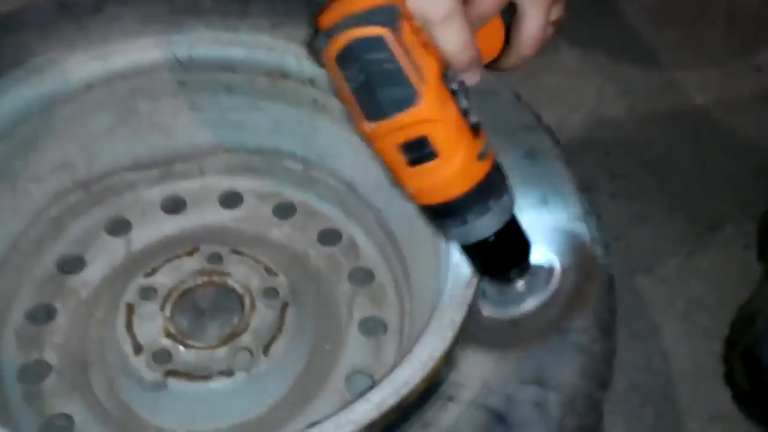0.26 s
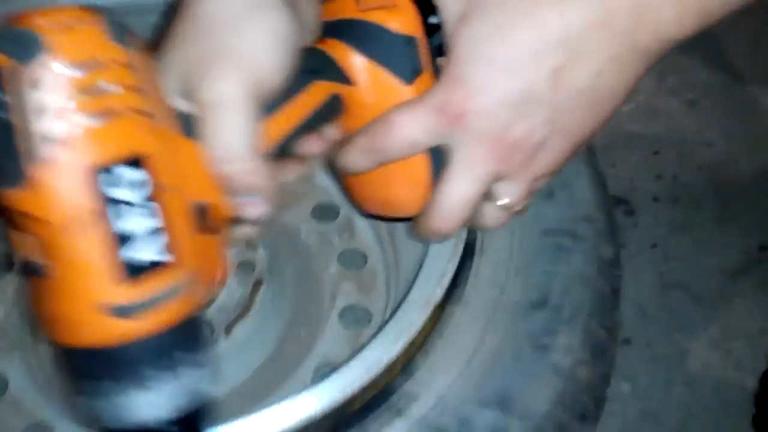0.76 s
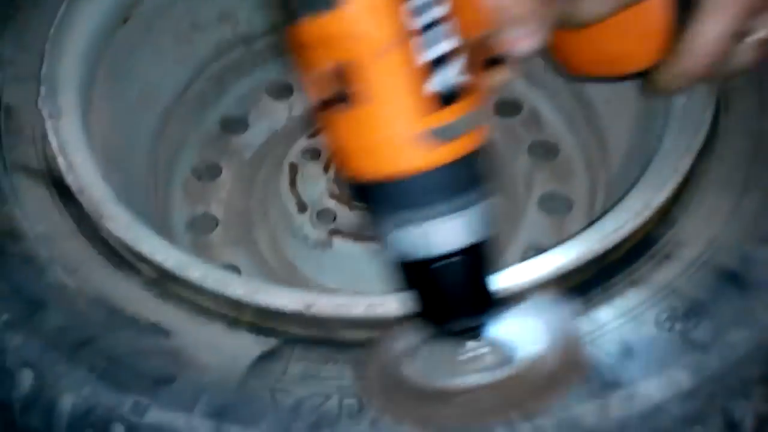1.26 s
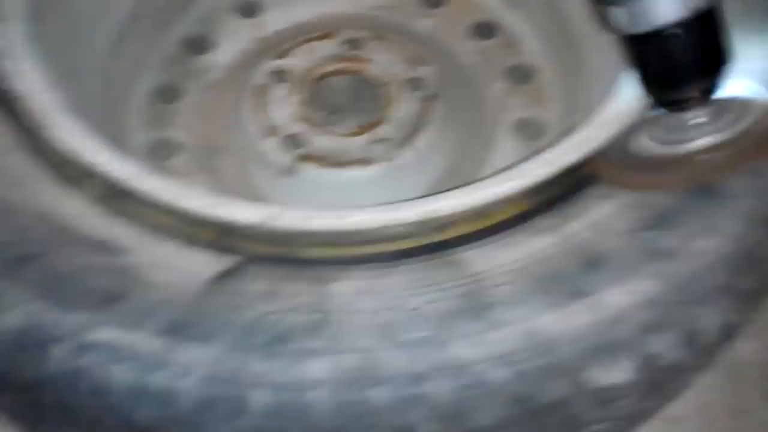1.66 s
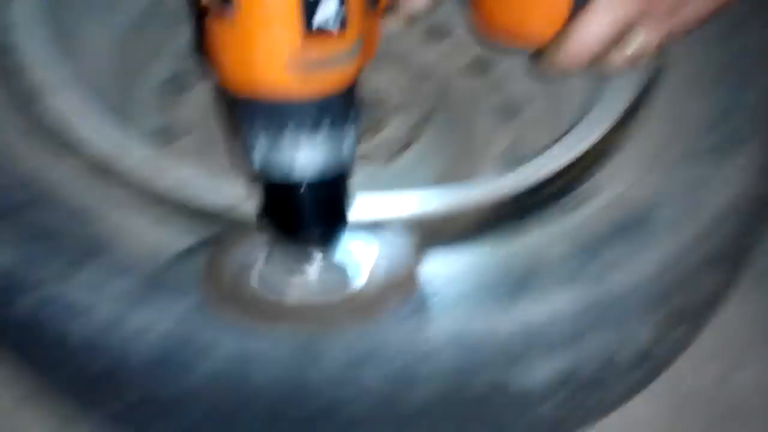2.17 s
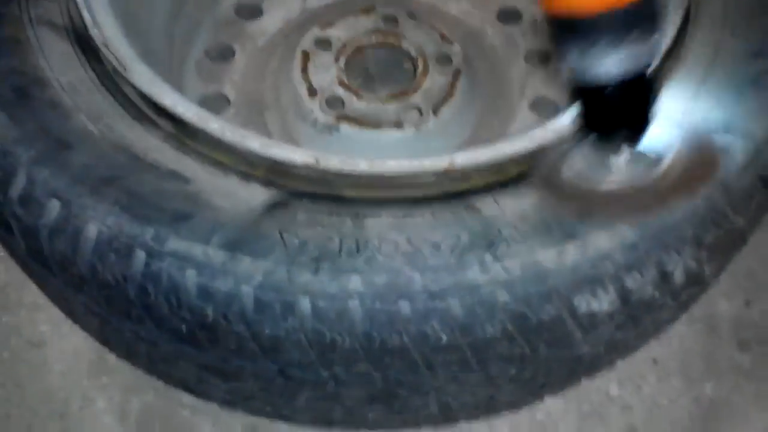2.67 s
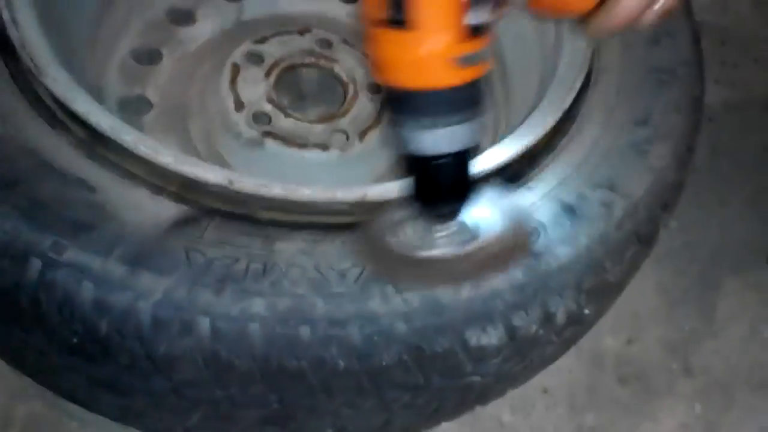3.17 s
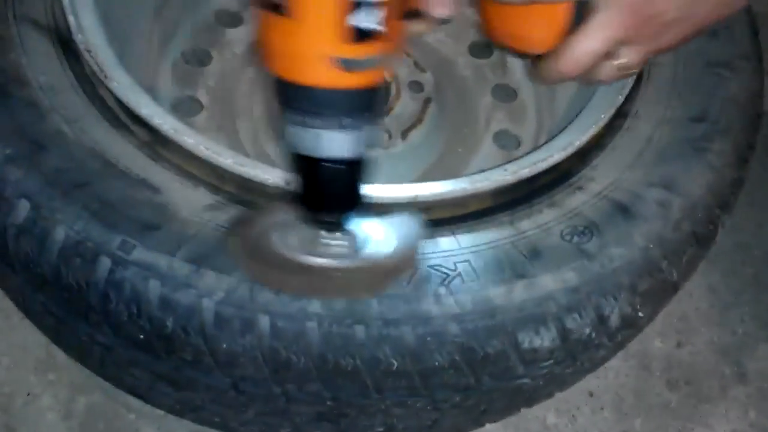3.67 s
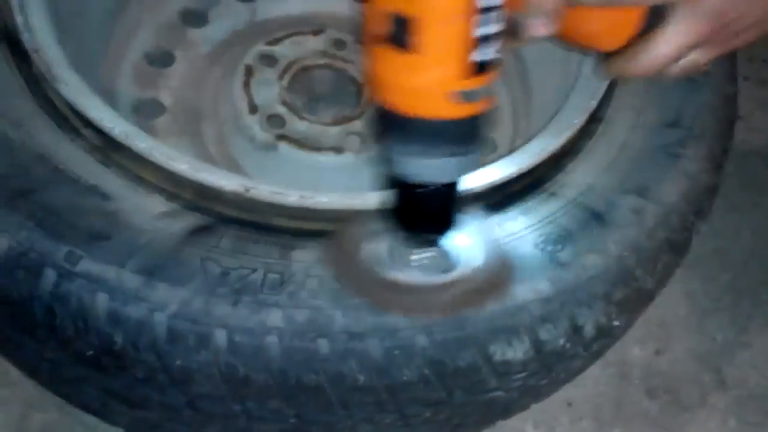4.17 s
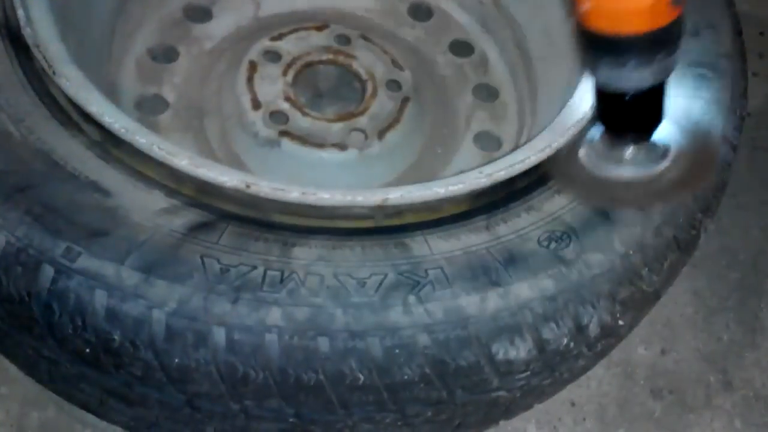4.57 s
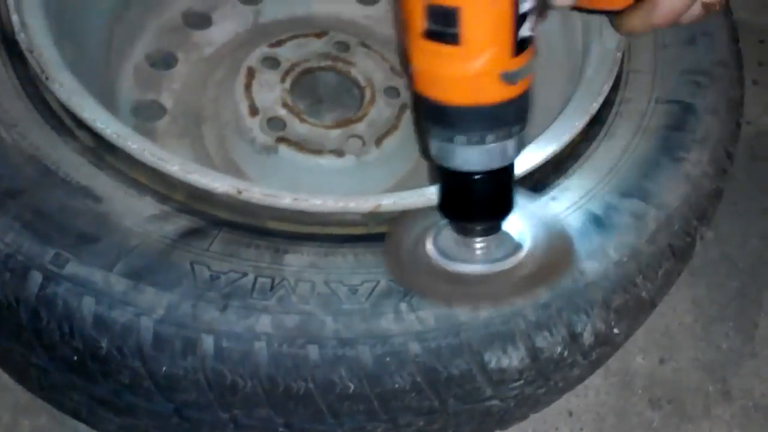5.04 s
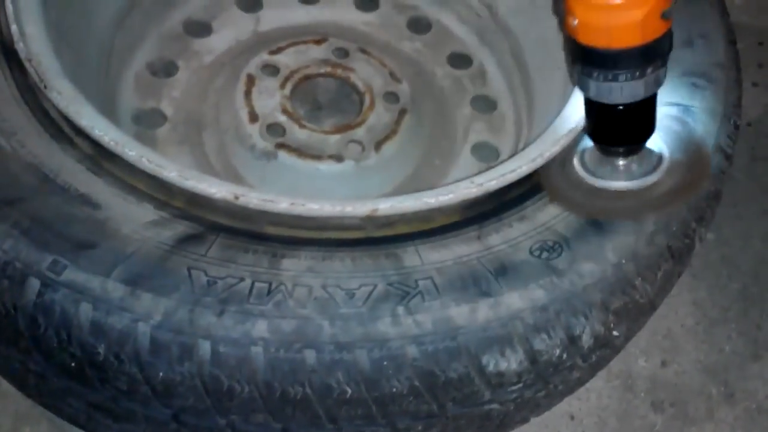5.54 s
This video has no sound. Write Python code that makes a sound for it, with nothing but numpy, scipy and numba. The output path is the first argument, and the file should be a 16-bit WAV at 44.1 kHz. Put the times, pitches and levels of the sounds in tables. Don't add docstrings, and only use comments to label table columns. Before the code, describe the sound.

Dense, gritty wire-brush scrubbing fills a garage, fluttering rapidly, with wavering drill whine, sharp wire clicks and a low hollow tyre hum.

```python
import sys
import numpy as np
from scipy import signal
from scipy.fft import rfft, irfft
from scipy.io import wavfile
from numba import njit

SR = 44100
rng = np.random.default_rng(int(sys.argv[2]) if len(sys.argv) > 2 else 0)


def voltage_ratio(level):
    return 10 ** (np.asarray(level, float) / 20)


def waveform_to_disk(signal):
    frames = np.transpose(np.atleast_2d(signal))
    scaled = np.clip(frames, -1, 1) * 32767
    samples = np.round(scaled).astype(np.int16)
    wavfile.write(sys.argv[1], SR, samples)


N = 256220

# t/s, turns ahead of the mean speed, swell level/dB
WHEEL_WOBBLE = [(0, .15, .6), (.4, .14, 1.4), (.95, .72, .8), (1.11, .2, .2), (1.3, .02, 1.8),
                (1.58, .17, 2.9), (1.78, -.03, 2), (1.95, -.58, .5), (2.4, -.16, .9), (2.76, -.09, 2.4),
                (3.1, -.23, 1.3), (3.24, .13, .9), (3.8, .32, .7), (3.95, .58, .8), (4.5, .67, 1.7),
                (4.82, .18, 1.2), (5.15, .54, 1.4), (5.81, .34, .7)]
# t/s, scouring level/dB, lean from steel rim 0 to rubber wall 1
HAND = [(0, -21, 0.55), (.12, -18, 0), (.32, -17.5, 0.08), (.61, -20, 0.57), (.8, -18, 0.46),
        (1.03, -17, 0.61), (1.11, -14.5, 0.24), (1.27, -17.5, 0.43), (1.5, -16.5, 0.02), (2.04, -17, 0.75),
        (2.46, -15.5, 0.25), (2.9, -19, 0.19), (3.17, -21.5, 1), (4.43, -18.5, 0.62), (4.7, -18.5, 0.46),
        (4.95, -20.5, 0.99), (5.3, -19, 0.45), (5.81, -18.5, 0.23)]
# f/Hz, level/dB (per Hz)
SCOUR_COLOUR = [(180, -32.5), (300, -14.5), (400, -20.5), (596, -15.5), (722, -11.5), (1250, -7),
                (1490, -10), (2380, -9), (2900, -4.5), (4120, -.5), (5500, -6.5), (6800, -9.5), (7400, -14),
                (8000, -29.5)]
# start t/s, end t/s, from f/Hz, to f/Hz, level/dB
RIM_GLINTS = [(-.5, .36, 4200, 4000, -1), (.32, .95, 3990, 4740, 0.5), (.75, 1.16, 4810, 4230, 1),
              (.88, 1.14, 3980, 3810, -1.5), (1.2, 1.5, 4370, 4590, -5.5), (1.7, 2.3, 4250, 4030, -2),
              (2.2, 3.1, 4440, 4120, -14.5), (3.15, 3.8, 4250, 4270, -0.5), (3.9, 4.35, 4480, 4440, 0.5),
              (4.2, 5.1, 4040, 4180, 0.5), (4.9, 5.5, 4000, 4270, 0), (5.4, 5.85, 4310, 4080, -1.5)]
# start t/s, end t/s, from f/Hz, to f/Hz, level/dB
WALL_GLINTS = [(.42, .75, 4060, 4550, -2.5), (.58, .9, 4410, 4880, 0), (-.3, 0.298, 5560, 5500, 2.5),
               (0.347, 0.794, 6440, 7460, 2.5), (0.398, 1.0, 1760, 1700, 6.5),
               (0.854, 1.505, 1590, 1910, 1.5), (1.245, 1.75, 5840, 5190, 1), (1.7, 2.799, 1663, 1750, -12),
               (1.744, 2.196, 6150, 6140, -6), (2.151, 2.948, 6120, 5410, 3),
               (2.899, 3.903, 1707, 1520, -6), (3.0, 3.45, 4600, 5080, 8.5), (3.3, 4.15, 4820, 4900, 5.5),
               (.8, 1.35, 630, 582, 0), (2.4, 3.1, 1275, 1354, -10), (2.6, 3.15, 4350, 4450, -7.5),
               (2.7, 3.15, 5750, 5460, -2), (2.75, 3.1, 3460, 3370, -6.5), (4.004, 4.361, 5350, 5440, 5),
               (4.2, 5.204, 1850, 1816, -20.5), (4.7, 5.4, 5050, 5140, 2), (5.2, 6.102, 5180, 5050, -4.5)]
# start t/s, end t/s, from f/Hz, to f/Hz, share removed 0-1
FLOOR_SHADOWS = [(-.3, 0.548, 2300, 2170, 0.2), (.3, 0.699, 3450, 3630, .4), (0.557, .92, 3800, 4020, 0.3),
                 (1.244, 1.95, 2350, 2170, 0.6), (1.944, 2.444, 2250, 2150, 0.93),
                 (2.445, 3.141, 2300, 2330, 0.3), (4.104, 4.548, 2400, 2430, .4),
                 (4.607, 4.95, 2300, 2290, .3), (5.155, 5.9, 2250, 2320, 0.18)]
# start t/s, end t/s, from f/Hz, to f/Hz, share added
DISH_STREAKS = [(1.7, 2.75, 1700, 1750, 0.65), (1.746, 2.551, 1040, 1083, 0.67),
                (2.446, 3.154, 1190, 1340, 0.38), (3.101, 3.8, 1620, 1616, 0.13),
                (3.145, 4.151, 1374, 1327, 0.25), (3.948, 4.555, 1787, 1800, 0.61),
                (4.052, 4.75, 1233, 1200, 0.13), (4.753, 5.249, 1375, 1373, .6),
                (4.95, 5.8, 1202, 1247, 0.28), (3.957, 4.283, 480, 440, 1), (3.949, 4.25, 300, 297, 0.88),
                (2.302, 3.153, 1453, 1500, -0.31), (2.549, 3.045, 1002, 1030, -0.84),
                (3.603, 4.0, 1012, 1024, -.5), (4.0, 4.651, 1640, 1660, -.5), (4.2, 4.901, 1010, 997, -0.6),
                (5.047, 5.699, 1605, 1570, -.5), (5.149, 5.902, 1030, 1040, -.5)]
# f/Hz, width f/Hz, level/dB
WORK_MODES = [(509, 30, -51), (641.5, 53, -50.5), (914, 57, -47.5), (1325, 170, -39.5), (2647, 140, -41.5)]
# start t/s, deepest t/s, end t/s, sag f/Hz, whine level/dB
BITES = [(-.1, .17, .5, 270, -36), (.7, .83, .98, 200, -29), (.8, .99, 1.12, 400, -17.5),
         (1.0, 1.1, 1.3, 300, -26), (1.2, 1.45, 1.6, 85, -29), (1.38, 1.6, 1.95, 125, -28),
         (1.95, 2.35, 2.68, 30, -34), (2.5, 2.69, 2.9, 210, -28), (2.72, 2.9, 3.1, 225, -31),
         (3.15, 3.48, 3.75, 95, -34), (4.04, 4.14, 4.26, 230, -27.5), (4.12, 4.29, 4.36, 230, -30),
         (4.26, 4.41, 4.56, 150, -29.5), (4.42, 4.57, 4.72, 380, -28), (4.58, 4.71, 4.83, 370, -30.5),
         (4.72, 4.8, 4.85, 200, -28), (5.14, 5.19, 5.4, 100, -28), (5.24, 5.38, 5.5, 265, -27),
         (5.42, 5.5, 5.6, 100, -31), (5.5, 5.66, 5.84, 400, -26.5), (5.68, 5.76, 5.95, 60, -38)]
# t/s, gain level/dB, pitch lift f/Hz
GRABS = [(.785, 0, -29.5), (.83, 6.5, 0), (.865, 0, 40), (.895, 0.5, 10), (.925, -2, 18.5), (.955, -5, -29),
         (.987, 3, 19.5), (1.015, -10.5, -39.5), (1.052, 3.5, 10), (1.085, -1.5, -59.5), (1.118, 9, -12),
         (1.315, 3, -50.5), (1.425, 1.5, 33), (1.48, -1.5, 19), (1.538, -0.5, -11), (1.598, 1.5, -1),
         (1.657, 3, 0), (1.71, 4, 19.5), (1.772, 3, -29), (2.637, 0.5, -9), (2.665, -5, 1),
         (2.697, -1, -20), (2.722, -5, 1.5), (2.751, 0.5, -21.5), (2.78, -5, -0.5), (2.81, -1.5, -29.5),
         (2.842, -6.5, 0), (2.872, 0, -20), (2.9, -4, 0.5), (2.93, 2, -11.5), (2.957, -5, 0),
         (2.98, 1, -28.5), (4.1, 1.5, -0.5), (4.14, -0.5, -0.5), (4.188, 7.5, 10.5), (4.31, -5.5, 1.5),
         (4.365, 4, 1.5), (4.42, -2, -0.5), (4.477, 0.5, 24), (4.525, 1, 69.5), (4.588, 2, 20.5),
         (4.62, -2.5, 1), (4.65, 11.5, -27.5), (4.72, -2, -1.5), (4.745, 1.5, -30), (4.803, -4, 30.5),
         (5.165, -1, -39.5), (5.2, 5, 0.5), (5.29, 3.5, -0.5), (5.335, -4, -29.5), (5.403, 0, -21.5),
         (5.47, 0, 0), (5.52, 1, -0.5), (5.545, -4, -1), (5.575, 4.5, -20), (5.645, 2.5, -7),
         (5.678, -4, -1.5), (5.705, 2, -20), (5.755, 2, 2)]
# t/s, rotor hum gain level/dB, half-speed hum gain level/dB
FACING = [(0, 6, -15), (.5, -4.5, 2.5), (.9, 3, -7.5), (1.5, -2, 1), (1.95, -2, -1.5), (2.5, -2.5, -7.5),
          (2.8, 5, -12), (3.1, -2.5, -3.5), (3.6, 1.5, -8.5), (3.9, -3, -6), (5.81, -0.5, -6.5)]
# t/s, peak level/dB
SNAPS = [(.883, -3), (.939, 0), (.968, -5), (1.038, -4), (1.155, -8), (1.177, 1), (1.197, -4), (1.244, -2),
         (1.25, 4), (1.542, -12), (1.595, -1.5), (1.652, -10), (2.178, -8), (2.57, -3), (2.64, -10),
         (2.76, -7), (2.928, -4), (3.36, -5.5), (4.543, -4)]
# f/Hz, width f/Hz, level/dB
TYRE_MODES = [(169, 15, -5.5), (189, 13, 5), (203.1, 15, 7.5), (260, 27, 1), (296, 160, 0.5)]
# start t/s, top t/s, end t/s, hum gain level/dB
PUSHES = [(-.2, .2, .32, 10.5), (.3, 0.648, 0.68, 6.5), (.75, .89, 1.38, 10), (1.05, 1.195, 1.26, 6),
          (1.25, 1.572, 1.5, 10), (1.7, 1.91, 1.8, 11), (2.197, 2.45, 2.75, 5.5), (2.5, 2.9, 3.1, 6.5),
          (3.282, 3.402, 3.7, 8), (3.826, 4.0, 6.4, 6), (4.3, 4.44, 4.53, 5), (4.564, 4.63, 4.9, 3.5),
          (4.724, 4.77, 5.3, 1.5), (5.0, 5.24, 5.44, 8.5), (5.37, 5.65, 7.9, 9.5)]

MEAN_TURNS_PER_S = 17.5
PINION_TEETH, FREE_MESH_HZ = 9, 2970


def rms_one(x):
    return x / np.sqrt(np.mean(x ** 2) + 1e-20)


def in_time(rows):
    s, *columns = np.transpose(rows)
    return [np.interp(np.arange(N) / SR, s, column) for column in columns]


def drift(rate):
    r = np.exp(-80 * np.pi * rate / SR)
    slow = signal.lfilter([1], [1, -2 * r, r * r], rng.standard_normal(N // 40 + 2002))[2000:]
    return np.interp(np.arange(N) / 40, np.arange(len(slow)), rms_one(slow))


def bump(start_s, top_s, end_s):
    return np.sin(np.pi / 2 * np.interp(np.arange(N) / SR, [start_s, top_s, end_s], [0, 1, 0])) ** 2


@njit
def sweep(x, cosine, r):
    y = np.zeros(len(x))
    for i in range(2, len(x)):
        y[i] = (1 - r * r) / 2 * (x[i] - x[i - 2]) + 2 * r * cosine[i] * y[i - 1] - r * r * y[i - 2]
    return y


def resonate(x, hz, width_hz):
    return sweep(x, np.cos(2 * np.pi * hz / SR) * np.ones(N), np.exp(-np.pi * width_hz / SR))


def resonate_twice(x, hz, width_hz):
    return resonate(resonate(x, hz, width_hz), hz, width_hz)


def swell(second=0.075, lag=0.26):
    ahead, depth_db = in_time(WHEEL_WOBBLE)
    angle = 2 * np.pi * (MEAN_TURNS_PER_S * np.arange(N) / SR + ahead)
    press_db = depth_db * (np.cos(angle) + second * np.cos(2 * angle + lag))
    return press_db, depth_db * np.sin(angle)


def ticks(per_s=22000, spread_db=1.1):
    sizes = voltage_ratio(spread_db * np.minimum(rng.exponential(1, N), 4)) * rng.standard_normal(N)
    return rms_one(sizes * (rng.random(N) < per_s / SR))


def bristles(press_db):
    scour_db, lean = in_time(HAND)
    wall_db = -14 + 6.5 * lean
    tips_db = -9 + 5.5 * lean
    tips_db = tips_db - 0.5 * (FREE_MESH_HZ - load()[0]) / 1000
    source = ticks()
    source = source + glints(source) - shadows(source) + streaks(source)

    spectrum = rfft(source)
    hz = np.arange(N // 2 + 1) * SR / N + 1
    colour_hz, colour_db = np.transpose(SCOUR_COLOUR)
    spectrum *= voltage_ratio(np.interp(np.log(hz), np.log(colour_hz), colour_db))

    centres = 250 + 7950 * np.linspace(0, 1, 26) ** 1.6
    tilt_hz = [0, 2100, 2900, 5000, 5800, 9000]
    tilts_db = [wall_db + 5.5, wall_db + 11.5, 0 * wall_db, 0 * wall_db, tips_db + 7, tips_db + 3.0]
    out = np.zeros(N)
    for k, centre in enumerate(centres):
        band = np.interp(hz, centres, np.arange(len(centres)) == k)
        place = np.interp(centre, tilt_hz, np.arange(6))
        below, between = int(place), place % 1
        tilt_db = (1 - between) * tilts_db[below] + between * tilts_db[below + 1]
        patch_db = 1.2 * drift(1.1) + 0.9 * drift(18)
        depth = np.interp(centre, [300, 1200, 3000, 8000], [2.0, 1.1, 1.02, 1.0])
        out += irfft(spectrum * band, N) * voltage_ratio(tilt_db + patch_db + depth * press_db)
    return voltage_ratio(scour_db + 2.5) * out / np.std(out)


def gliding_band(source, start_s, end_s, from_hz, to_hz, width_hz):
    hz = np.interp(np.arange(N) / SR, [start_s, end_s], [from_hz, to_hz])
    return np.sqrt(bump(start_s, (start_s + end_s) / 2, end_s)) * resonate(source, hz, width_hz)


def glints(source):
    out = np.zeros(N)
    for table, width_hz in (RIM_GLINTS, 600), (WALL_GLINTS, 430):
        for *glide, db in table:
            out += voltage_ratio(db) * gliding_band(source, *glide, width_hz)
    return out


def shadows(source):
    return sum(np.clip(share, 0, 1) * gliding_band(source, *glide, 460)
               for *glide, share in FLOOR_SHADOWS)


def streaks(source):
    return sum(np.clip(share, -1, 2) * gliding_band(source, *glide, 160)
               for *glide, share in DISH_STREAKS)


def modes(table, press_db):
    rub = rng.standard_normal(N) * voltage_ratio(0.89 * press_db)
    return sum(voltage_ratio(db + 0.54 * drift(0.58)) * rms_one(resonate_twice(rub, hz, 1.3 * width_hz))
               for hz, width_hz, db in table)


def skidding():
    start_s, end_s, attack_s, release_s = 1.115, 1.272, .025, .02
    corners_s = [start_s, start_s + attack_s, end_s - release_s, end_s]
    return np.interp(np.arange(N) / SR, corners_s, [0, 1, 1, 0])


def skid():
    rasp = resonate_twice(ticks(per_s=28000, spread_db=-13.5), 4100, 1300)
    return voltage_ratio(-12.5) * skidding() * rms_one(rasp)


def snaps():
    clicks = np.zeros(N)
    for s, peak_db in SNAPS:
        clicks[round(s * SR)] = voltage_ratio(peak_db)
    return 2.8 * resonate(clicks, 3100, 1900) + 6.0 * resonate(clicks, 4900, 700)


def load():
    shapes = np.array([bump(*bite[:3]) for bite in BITES])
    sag_hz, whine_db = np.transpose(BITES)[3:]
    power = voltage_ratio(-54) ** 2 + voltage_ratio(whine_db) ** 2 @ shapes ** (2 * 0.62)
    relief = 1 - .85 * skidding()
    return FREE_MESH_HZ - sag_hz @ shapes, np.sqrt(power) * relief


def grabs():
    half_s = .022
    shapes = np.array([bump(s - half_s, s, s + half_s) for s, *_ in GRABS])
    return np.transpose(GRABS)[1:] @ shapes


def gears(press_db, drag):
    mesh_hz, sing = load()
    steady = 2 * np.pi * np.cumsum(mesh_hz * (1 + 0.0028 * drift(7.5))) / SR / PINION_TEETH
    rotor_db = -50.5 - 19.5 * (FREE_MESH_HZ - mesh_hz) / 1000

    felt = np.minimum(in_time(WHEEL_WOBBLE)[1] / 1.8, 1)
    press_db, drag = felt * press_db, np.maximum(felt, .8) * drag
    flare_db, lift_hz = grabs()
    mesh_hz = mesh_hz * (1 - 0.011 * drag + 0.0035 * drift(36.2)) + lift_hz
    rotor = 2 * np.pi * np.cumsum(mesh_hz) / SR / PINION_TEETH

    rattle = rms_one(resonate_twice(rng.standard_normal(N), mesh_hz, 160)) / np.sqrt(2)
    teeth = np.sin(PINION_TEETH * rotor) + voltage_ratio(-9.5) * np.sin(2 * PINION_TEETH * rotor)
    whine = (teeth + voltage_ratio(-6) * rattle) * voltage_ratio(3.3 * press_db + 0.8 * drift(35) + flare_db - .5)

    side_gain = voltage_ratio(-23.5) * sing + voltage_ratio(-49 + 4.3 * press_db) * in_time(HAND)[1] ** 2
    side = side_gain * np.sin((PINION_TEETH - 1) * rotor) * voltage_ratio(4.7 * drift(21))

    full_db, half_db = in_time(FACING)
    hum = voltage_ratio(full_db) * (np.sin(steady) + voltage_ratio(-7.5) * np.sin(2 * steady))
    hum = hum + voltage_ratio(half_db - 2.0) * np.sin(steady / 2)
    return np.sqrt(2) * (sing * whine + side + voltage_ratio(rotor_db + 0.8 * drift(3.0)) * hum)


def tyre(press_db):
    hum_db = -54 + 0.64 * np.arange(N) / SR
    for *push, gain_db in PUSHES:
        hum_db = hum_db + gain_db * bump(*push)
    return voltage_ratio(hum_db) * rms_one(modes(TYRE_MODES, press_db))


def walls(x, count=9):
    t60_s, wet_gain = 0.56, voltage_ratio(-11.5)
    s = np.arange(SR // 2) / SR
    shape = voltage_ratio(-60 * s / t60_s) * (s > .004)
    place, wet = np.linspace(0, count - 1, N), np.zeros(N)
    for k in range(count):
        tail = rms_one(rng.standard_normal(len(s)) * shape) / np.sqrt(len(s))
        here = np.cos(np.pi / 2 * np.clip(place - k, -1, 1))
        wet += signal.fftconvolve(x * here, tail)[:N]
    return (x + wet_gain * wet) / np.hypot(1, wet_gain)


def garage():
    band = signal.butter(2, [65, 135], "band", fs=SR, output="sos")
    return voltage_ratio(-75) * rms_one(signal.sosfilt(band, rng.standard_normal(N)))


def scene():
    press_db, drag = swell()
    hum = tyre(press_db)
    work = bristles(press_db) + modes(WORK_MODES, press_db) + gears(press_db, drag) + snaps() + skid()
    mono = walls(work) + hum + garage()
    return np.stack([mono, mono])


def roll_off(x):
    return signal.sosfilt(signal.butter(12, 8110, fs=SR, output="sos"), x)


def record(dry):
    narrow = signal.sosfilt(signal.ellip(12, .1, 60, 8060, fs=SR, output="sos"), dry)
    narrow = signal.sosfilt(signal.butter(4, 60, "high", fs=SR, output="sos"), narrow)
    hiss = signal.sosfilt(signal.cheby2(12, 60, 16000, fs=SR, output="sos"), rng.standard_normal(N))
    mix = np.clip(narrow, -1, 1) + voltage_ratio(-108) * hiss
    return roll_off(mix)


dry = scene()
out = record(dry)
waveform_to_disk(out)
```